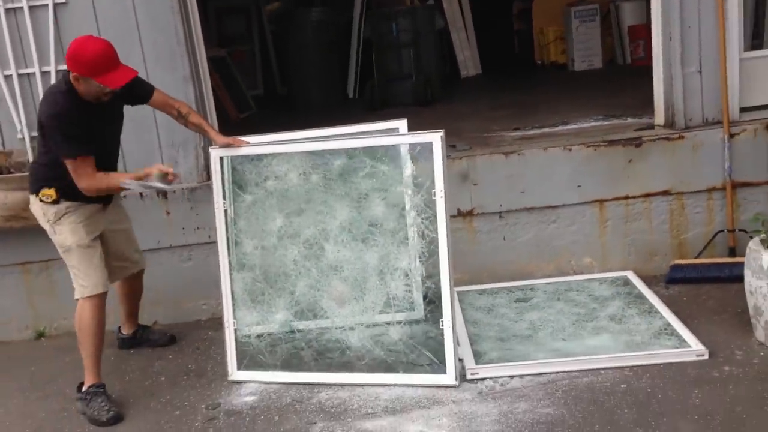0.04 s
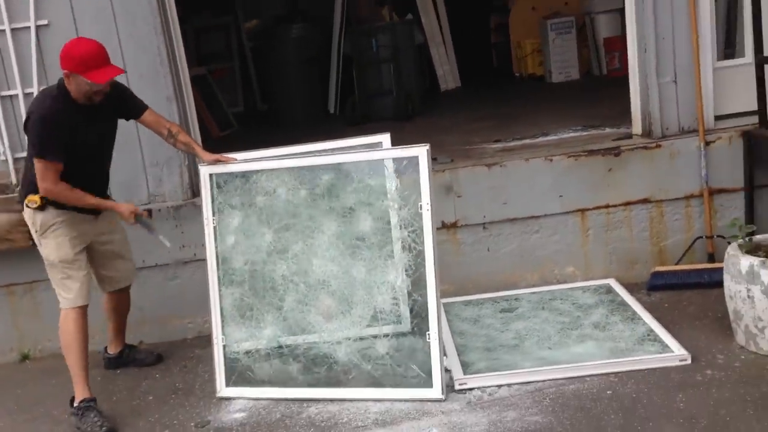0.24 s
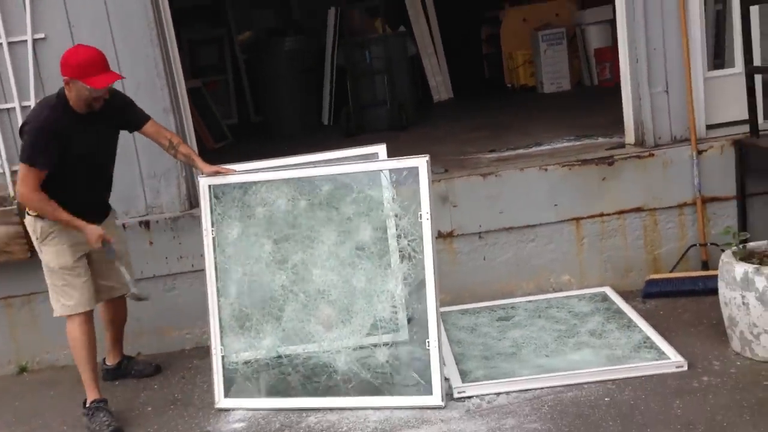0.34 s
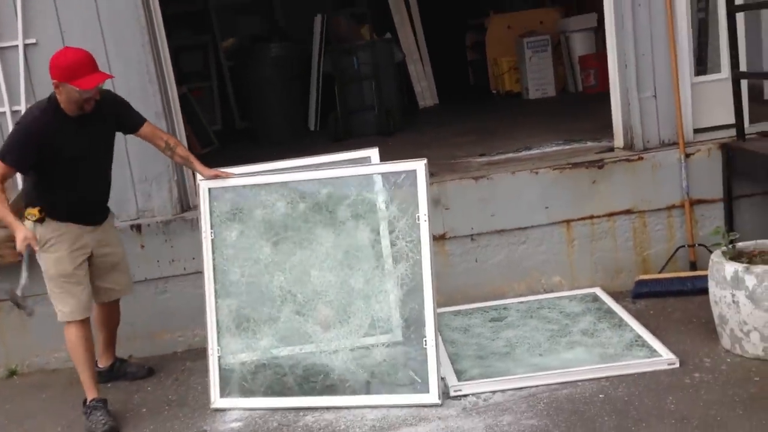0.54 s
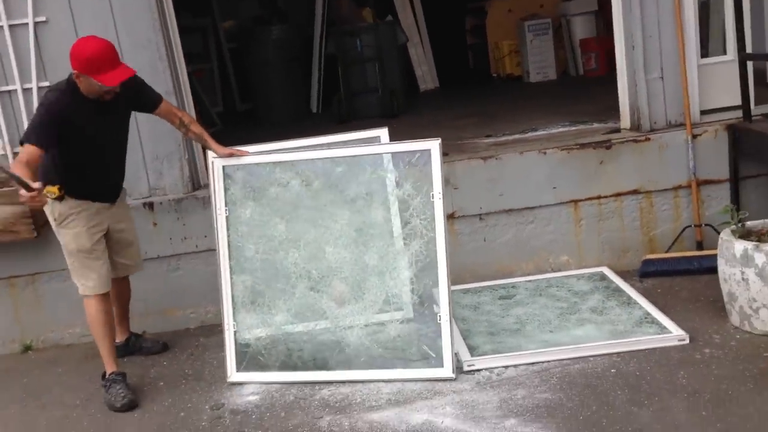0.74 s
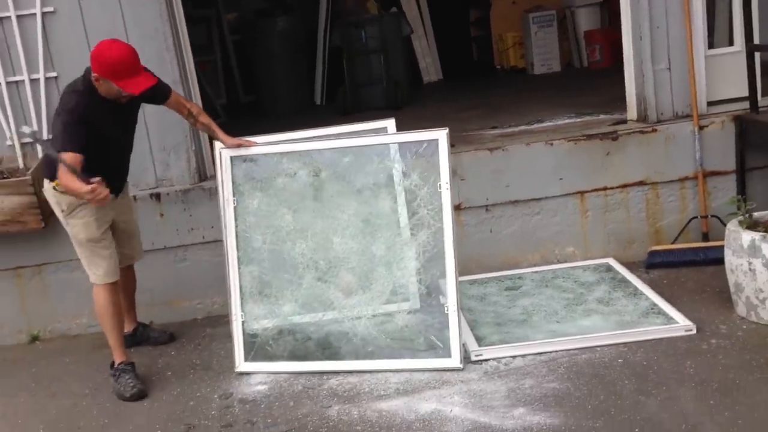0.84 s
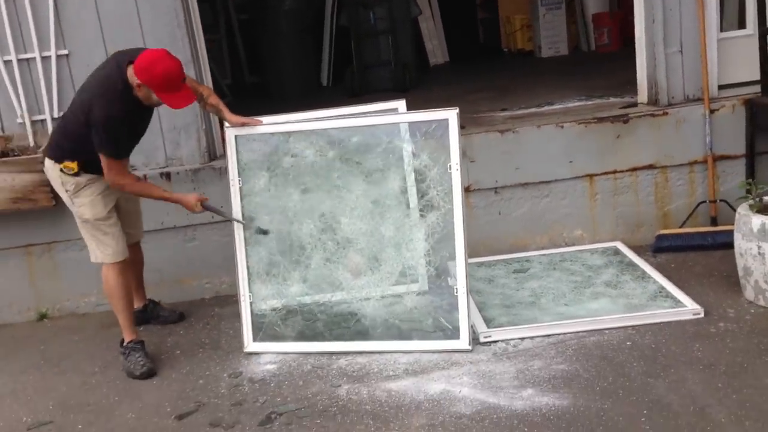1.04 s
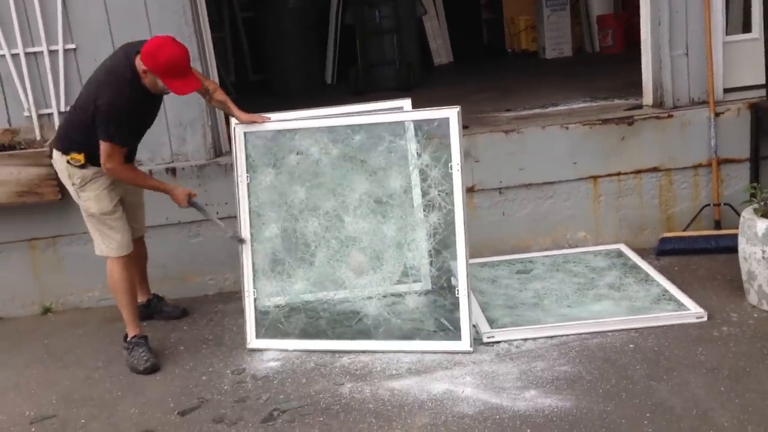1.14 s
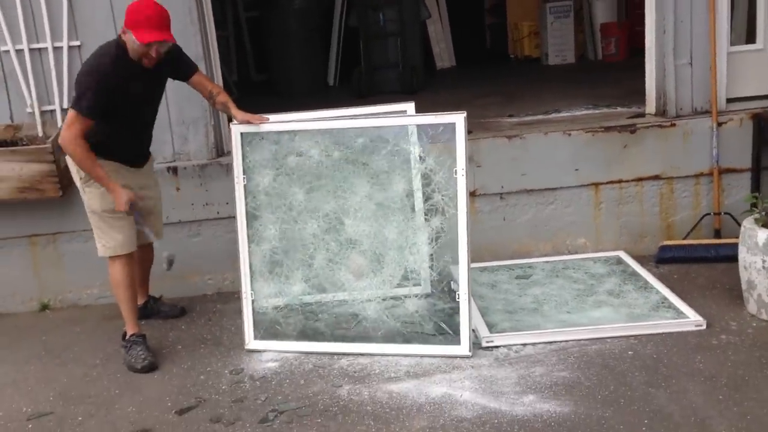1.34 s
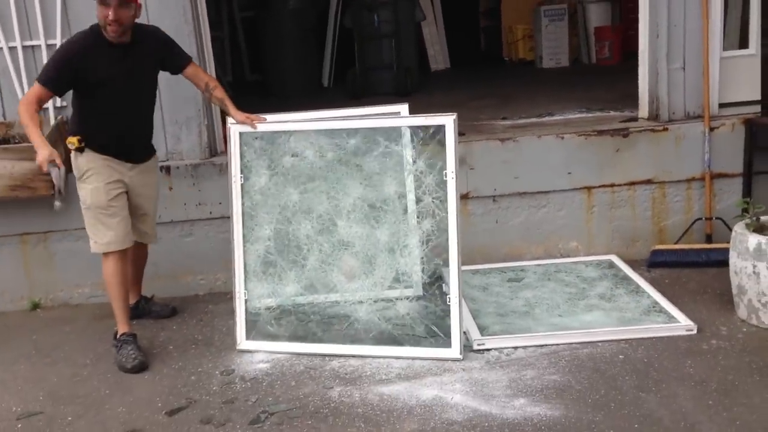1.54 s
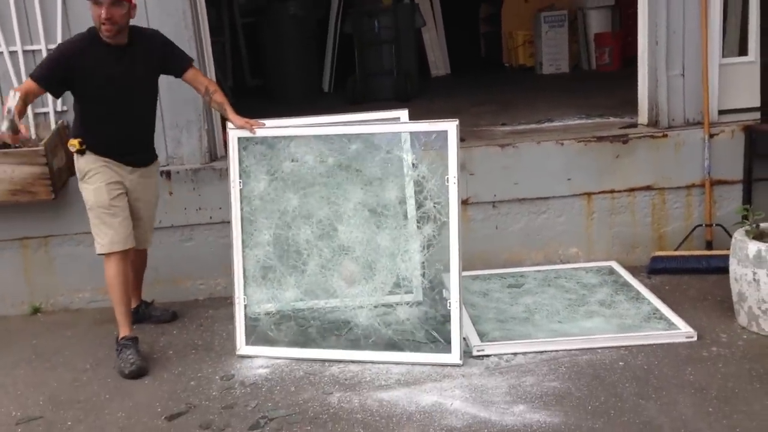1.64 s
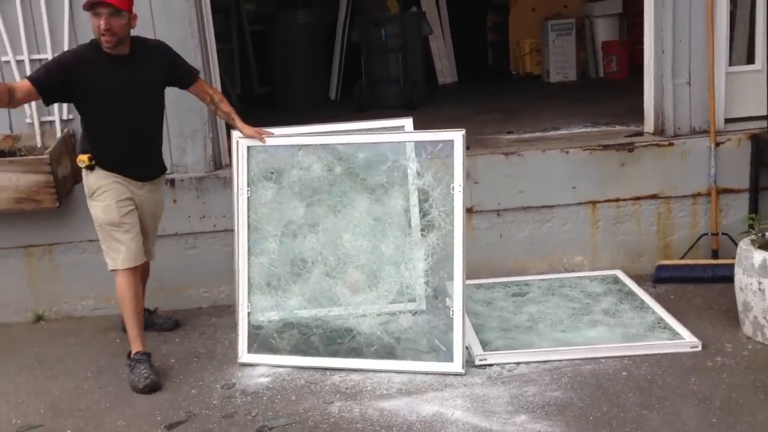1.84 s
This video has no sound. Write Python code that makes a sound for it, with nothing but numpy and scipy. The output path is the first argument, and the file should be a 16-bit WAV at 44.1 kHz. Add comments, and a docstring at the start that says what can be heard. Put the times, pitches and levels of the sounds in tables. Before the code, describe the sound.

A hammer strikes a cracked glass pane at about 0.2 seconds with a sharp crack, a thud and a ringing crunch. Loose pieces clink and tick on the ground until about 1 second. A slightly softer blow lands near 1.2 seconds, crunching again, with light high tinkles from 1.4 to 1.9 seconds. Faint trickling grit, a short echo and a low outdoor rumble run throughout.

```python
"""In a yard in front of a loading dock, a hammer strikes a cracked, framed glass pane twice. Each impact gives
a sharp crack of fracture and a thud from the pane's low modes. Broken glass then crunches in swarms of tiny
contacts, loose pieces clink at their natural frequencies, the frame rings when knocked, fragments tick on the
ground and grit trickles. The wall reflects a short echo over a low outdoor rumble."""
import sys
import numpy as np
from scipy import signal
from scipy.io import wavfile
from scipy.ndimage import uniform_filter1d

SR = 44100
rng = np.random.default_rng(int(sys.argv[2]) if len(sys.argv) > 2 else 0)


def inscribe(sig):
    """Save sig as 16-bit PCM at rate SR to the path in sys.argv[1].

    A 1-D sig is mono; a 2-D sig holds one channel per row.
    Samples are clipped to [-1, 1] before scaling.
    """
    pcm = np.round(np.clip(np.atleast_2d(sig).T, -1, 1) * 32767)
    wavfile.write(sys.argv[1], SR, pcm.astype(np.int16))


N = 83790
BAND_LIMIT_HZ = 15300


def hammer_blow(crack_db, crack_t60, thud_db, tilt_db):
    """Impact excitation: the hammer cracks the glass and sets the pane's damped modes vibrating."""
    # Each row: frequency in Hz, relative level in dB, time to fall 60 dB (t60) in seconds.
    pane_modes = [(119, -13, 0.12), (173.7, -2.5, 0.13), (194.2, -2, 0.083), (232, -17, 0.12),
                  (317.6, -9, 0.098), (532.7, -1.5, 0.06), (570.3, -1, 0.061), (737.5, 1, 0.054),
                  (803.5, -5, 0.074), (950, -15, 0.074)]
    push_s, low_cut_hz = 0.0024, 213  # the pane takes time to move and hardly radiates below the cut
    t = np.arange(SR // 4) / SR
    modes = sum(amp(db + tilt_db * np.log2(hz) - 60 * t / t60) * np.cos(2 * np.pi * hz * t)
                for hz, db, t60 in pane_modes)
    radiation = signal.butter(2, low_cut_hz, "high", fs=SR, output="sos")
    thud = signal.sosfilt(radiation, modes * (1 - np.exp(-t / push_s)))
    return amp(thud_db) * unit_peak_rms(thud) + amp(crack_db) * snap(crack_t60, low_hz=248, tilt_db=0)


def snap(t60, low_hz, tilt_db):
    """Brittle fracture: one hard contact starts a spray of clicks that decays exponentially."""
    t = np.arange(SR // 4) / SR
    spray = contacts(len(t), per_s=SR / 2) * amp(-60 * t / t60)
    spray[0] = -4.5  # the hard contact
    return unit_peak_rms(glass_colour(spray, low_hz, tilt_db))


def rattle(peak_s, rise_s, fall_t60, crunch_db, low_hz, tilt_db, piece, ring_db):
    """Superposed collisions crunch, scatter chips and ring one piece. Returns start time and sound."""
    t = np.arange(SR * 3 // 5) / SR
    lead_s = 2 * rise_s
    fall = amp(-60 * np.maximum(t - lead_s, 0) / fall_t60)
    swell = np.where(t < lead_s, (t / lead_s) ** 2, fall)
    crunch = unit_peak_rms(glass_colour(swell * contacts(len(t), per_s=5000), low_hz, tilt_db))
    chips = unit_peak_rms(glass_colour(chip_pings(swell), low_hz, tilt_db))
    chip_gain = amp(-1.5)
    debris = (crunch + chip_gain * chips) / np.hypot(1, chip_gain)
    knocks = swell ** 2 * contacts(len(t), per_s=700)
    add(knocks, lead_s, [0.79 * np.linalg.norm(knocks)])  # the piece lands
    return peak_s - lead_s, amp(crunch_db) * debris + amp(ring_db) * ringing_piece(piece, knocks)


def ringing_piece(piece, knocks):
    """Modal resonance: knocks ring a piece, and chatter against its neighbours modulates each mode."""
    # Each row, by piece (glass pieces and the pane's frame): frequency in Hz, relative level in dB, t60 in
    # seconds before treble damping.
    piece_modes = { "slab": [(1050, -25, 0.059), (1247, -1, 0.15), (1276, 5, 0.099), (1274, 0, 0.08),
                   (1370, 2, 0.16), (1522, -7, 0.15)], "large": [(1000, -14, .9), (2169, -14, .2),
                   (2366, 0, .48), (2386, -6, .4), (3022, -16, .3), (4533, -9, .2), (5066, -8, .4),
                   (5120, -1, .38), (5850, -9, .25), (7030, -11, .22), (7216, -12, .3), (9220, -16, .3),
                   (11400, -19, .3)], "sliver": [(4975, -7, .15), (5108, 0, .3), (5270, -5, .12),
                   (12020, -10, .14), (13716, -2, .13), (13875, -5, .13)], "strip": [(2380, -11, .5),
                   (2553, -7, .3), (4508, 0, .42), (5100, -7, .25), (5838, -9, .4), (7188, 1, .15),
                   (9328, -3, .13), (10936, -8, .17), (11134, -4, .16), (13172, -6, .2), (13850, -10, .2)],
                   "wedge": [(2283, -2, .12), (4496, -7, .2), (5469, -2, .11), (7193, -2, .12),
                   (7442, 1, .12), (8056, -6, .12), (8711, -3, .12)], "long": [(2157, -7, .4),
                   (2376, -3, .7), (3017, -5, .6), (3254, -3, .45), (4157, -2, .4), (4508, 0, .45),
                   (5181, -4, .35), (5621, -3, .25), (6570, -2, .3), (7208, -1, .3), (9423, 0, .25),
                   (10240, -6, .2)], "shard": [(3007, -8, .5), (3640, -2, .3), (4166, 0, .33),
                   (4503, -1, .2), (5087, -7, .35), (5621, -3, .33), (7675, -3, .25)],
                   "blade": [(1001, -6, .6), (2376, -8, .4)], "chip": [(4877, -8, .25), (6160, -6, .15),
                   (6294, -3, .15), (7033, -4, .15), (9545, -6, .22), (10291, -3, .15), (11564, 0, .25)], }
    flutter_per_khz, flutter_hz = 0.1, 109.3
    t, ring = np.arange(len(knocks)) / SR, 0
    for hz, db, t60 in piece_modes[piece]:
        treble_damping = 14 * (hz / 10000) ** 2  # extra decay rate in 1/s
        pole = np.exp((2j * np.pi * hz - np.log(1000) / t60 - treble_damping) / SR)
        mode = signal.lfilter([1], [1, -pole], knocks)
        wobble = rng.standard_normal(size=(200, 2)) @ [1, 1j]
        wobble = np.interp(t * flutter_hz, np.arange(len(wobble)), wobble)
        flutter = 1 + flutter_per_khz * hz / 1000 * wobble
        ring = ring + amp(db) * (flutter * mode / np.abs(mode).max()).imag * np.sqrt(2)
    return ring


def chip_pings(swell, count=70, t60=0.051, spread_db=3):
    """Free vibration: each chip rings at its own pitch, most often where the swell is strongest."""
    t = np.arange(SR // 10) / SR
    share = np.cumsum(swell) / swell.sum()
    pings = np.zeros(len(swell))
    for when, pitch, strength in rng.random((count, 3)):
        onset = np.searchsorted(share, when)
        hz = 1000 + pitch * (BAND_LIMIT_HZ - 1000)
        db = -spread_db * np.log(strength + .1) - 60 * t / t60
        add(pings, onset / SR, np.sqrt(swell[onset]) * amp(db) * np.sin(2 * np.pi * hz * t))
    return pings


def contacts(samples, per_s, spread_db=0.5):
    """A Poisson process: independent contacts give impulses of random sign and uneven strength."""
    strength = amp(spread_db * np.minimum(rng.exponential(1, samples), 3))
    return strength * rng.choice([-1., 1.], samples) * (rng.random(samples) < per_s / SR)


def glass_colour(x, low_hz, tilt_db, size=2048):
    """Minimum-phase filtering gives the colour of glass; smaller fragments have a higher low edge."""
    # Each row: frequency in Hz, relative spectral density in dB.
    glass_spectrum = [(200, 5), (700, 3), (1800, 1.5), (3000, 2.5), (5000, 1.5), (7000, -1), (9000, -6),
                      (11500, -8), (13500, -16), (15500, -11.5)]
    hz = np.abs(np.fft.fftfreq(size, 1 / SR)) + 1
    bass_loss_db = 10 * np.log10(1 + (low_hz / hz) ** 6)
    db = curve_at(glass_spectrum, hz) + tilt_db * np.log2(hz / 1000) - bass_loss_db
    log_gain = np.log(amp(np.maximum(db - db.max(), -80)))
    response = np.fft.ifft(np.exp(np.conj(signal.hilbert(log_gain)))).real
    return signal.fftconvolve(x, response[:size // 2])[:len(x)]


def trickling_grit():
    """Shot noise: tiny crumbs keep ticking down from the cracked pane."""
    # Each row: time in seconds, level in dB.
    grit_levels = [(.24, -58.5), (.3, -62), (.58, -52.5), (1.1, -53), (1.4, -58), (1.55, -55), (1.9, -51)]
    crumbs = glass_colour(contacts(N, per_s=900), low_hz=3240, tilt_db=1.5)
    return crumbs / crumbs.std() * amp(np.interp(np.arange(N) / SR, *np.transpose(grit_levels)))


def yard_echo(x, delay_s=.007, reflections_per_s=3000):
    """Reverberation: wall and ground scatter the sound, and each band decays at its own rate."""
    # Each row: frequency in Hz, t60 in seconds.
    decay_times = [(150, 0.22), (500, 0.28), (1500, 0.58), (4000, 0.34), (8000, 0.56), (15000, 0.57)]
    # Each row: frequency in Hz, echo level against the direct sound in dB.
    echo_levels = [(150, -20), (600, -10), (2000, -11.5), (6000, -11), (14000, -15.5)]
    reflections = rng.choice([-1., 1.], SR // 2) * (rng.random(SR // 2) < reflections_per_s / SR)
    hz, t, bands = signal.stft(reflections / reflections.std(), SR, nperseg=256)
    rate = np.log(1000) / curve_at(decay_times, hz)[:, None]
    decay = np.exp(-rate * t) * np.sqrt(2 * rate / SR)  # unit energy in each band
    tail = signal.istft(bands * decay * amp(curve_at(echo_levels, hz))[:, None], SR)[1]
    echo = np.zeros(N)
    add(echo, delay_s, signal.fftconvolve(x, tail))
    return echo


def outdoor_rumble(level_db=-47, waver_db=1):
    """Ambient noise: a low rumble with faint hiss, whose bands waver slightly in level."""
    # Each row: frequency in Hz, relative spectral density in dB.
    rumble_spectrum = [(25, -50), (60, -31), (110, -13.5), (150, -5.5), (185, 3.5), (230, -9.5),
                       (275, -3.5), (325, -9), (380, -5.5), (470, -17.5), (770, -13), (1000, -19),
                       (3200, -21.5), (5700, -36.5), (12600, -49), (15500, -47)]
    hz, _, bands = signal.stft(rng.standard_normal(N), SR, nperseg=2048)
    waver = uniform_filter1d(rng.standard_normal(bands.shape), size=5, axis=0)
    waver = uniform_filter1d(waver, size=4, axis=1)
    db = curve_at(rumble_spectrum, hz)[:, None] + waver_db * waver / waver.std()
    rumble = signal.istft(bands * amp(db), SR)[1][:N]
    return amp(level_db) * rumble / rumble.std()


def amp(db):
    """Decibels to amplitude ratio."""
    return 10 ** (np.asarray(db) / 20)


def curve_at(points, hz):
    """Interpolation of (Hz, value) points on a logarithmic frequency axis."""
    point_hz, value = np.transpose(points)
    return np.interp(np.log(hz + 1), np.log(point_hz + 1), value)


def add(mix, start_s, sound):
    """Superposition of a sound on the mix, in place."""
    part = mix[max(round(start_s * SR), 0):][:len(sound)]
    part += sound[:len(part)]


def unit_peak_rms(x, window=441):
    """Normalisation to an rms of 1 in the loudest window."""
    return x / np.sqrt(uniform_filter1d(x ** 2, window).max() + 1e-20)


def scene():
    """Superposition: the direct sound of the glass, its echo and the rumble sum in one channel."""
    # Each row: start in seconds, crack level in dB, crack t60 in seconds, thud level in dB,
    # thud tilt in dB per octave.
    blows = [(0.2342, -11, 0.019, -15.5, -0.5), (1.1747, -15, 0.018, -19.5, -4)]
    # Glass shifts and falls, and knocks set the frame ringing. Each row: peak time, half the rise time and t60
    # of the fall in seconds, crunch level in dB, low edge in Hz, tilt in dB per octave, name of the ringing
    # piece or frame, ring level in dB.
    rattles = [ (0.2452, 0.0053, 0.062, -17.5, 404, 0.5, "slab", -25.5),
               (.259, .014, 0.11, -16.5, 900, -0.5, "large", -22.5),
               (.31, 0.037, .27, -32.5, 590, 0.5, "large", -33.5),
               (.37, .02, 0.09, -48, 2000, 7, "blade", -33.5),
               (.463, 0.025, 0.082, -31.5, 1140, 3, "sliver", -34),
               (.499, .012, .12, -38, 221, 1.5, "sliver", -50.5),
               (0.632, 0.008, 0.095, -40.5, 2200, 6, "strip", -37.5),
               (0.674, .012, 0.04, -46, 3000, 1.5, "strip", -49.5),
               (.72, 0.0063, 0.16, -46, 350, -5.5, "strip", -48.5),
               (.75, .02, 0.071, -39, 4035, 19, "sliver", -45),
               (.80, 0.0082, 0.084, -35.5, 1790, 4.5, "wedge", -38),
               (.848, .008, .14, -28.5, 2390, 2, "long", -35),
               (.9, .026, 0.095, -34.5, 1270, 0, "long", -43),
               (.931, 0.0036, 0.14, -33, 5100, -2, "strip", -46),
               (.947, 0.0042, 0.14, -41.5, 2180, -6.5, "long", -46.5),
               (1.009, 0.028, 0.72, -51, 3000, 8, "strip", -54.5),
               (1.016, .025, .25, -66, 5000, 10, "blade", -41.5),
               (1.192, .012, 0.17, -24, 446, 0.4, "shard", -53),
               (1.217, .006, 0.07, -32.5, 455, -2.5, "slab", -52),
               (1.249, 0.022, 0.14, -27, 1450, 0.5, "shard", -33.5),
               (1.272, .008, 0.24, -33.5, 2000, 4, "shard", -46),
               (1.312, .025, 0.14, -31.5, 1210, 4, "shard", -42.5),
               (1.445, 0.016, 0.067, -47.5, 4540, 6, "chip", -48.5),
               (1.722, .015, 0.3, -40.5, 4030, 4, "chip", -45.5),
               (1.756, 0.018, 0.096, -40.5, 5000, 7.5, "chip", -40),
               (1.897, 0.0099, 0.042, -47, 4000, 2, "wedge", -42), ]
    # Fragments knock on the ground. Each row: start in seconds, level in dB, t60 in seconds,
    # low edge in Hz, tilt in dB per octave.
    ground_ticks = [(.085, -46.5, 0.049, 1220, -9.5), (0.7732, -35.5, 0.036, 298, -4),
                    (0.7815, -35.5, 0.09, 397, -1.5), (1.6008, -44, 0.036, 1210, 1),
                    (1.612, -39, 0.068, 1200, 1)]
    glass = trickling_grit()
    for start_s, *row in blows:
        add(glass, start_s, hammer_blow(*row))
    for row in rattles:
        add(glass, *rattle(*row))
    for start_s, db, t60, low_hz, tilt_db in ground_ticks:
        add(glass, start_s, amp(db) * snap(t60, low_hz, tilt_db))
    return (glass + yard_echo(glass) + outdoor_rumble())[None]


def record(dry, ceiling=0.58):
    """Soft saturation: the microphone rounds off the highest peaks; a low-pass then limits the band."""
    rounded = ceiling * np.tanh(dry / ceiling)
    low_pass = signal.firwin(511, BAND_LIMIT_HZ, window=("kaiser", 9), fs=SR)
    return signal.oaconvolve(rounded, low_pass[None], "same")


dry = scene()
out = record(dry)
inscribe(out)
```